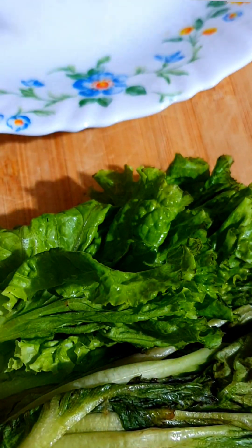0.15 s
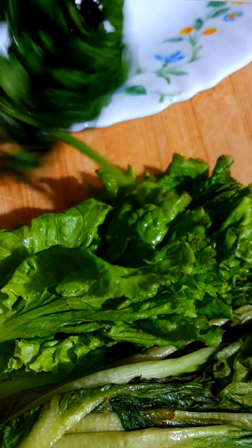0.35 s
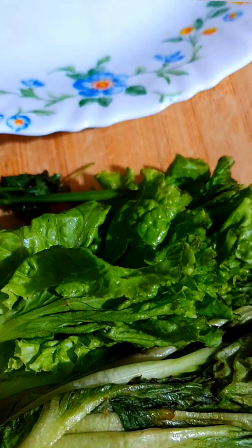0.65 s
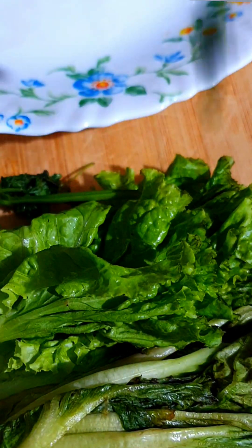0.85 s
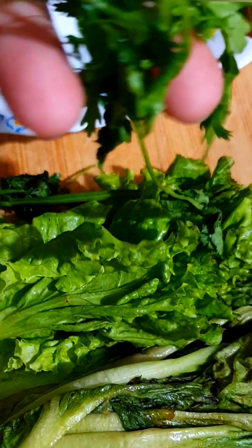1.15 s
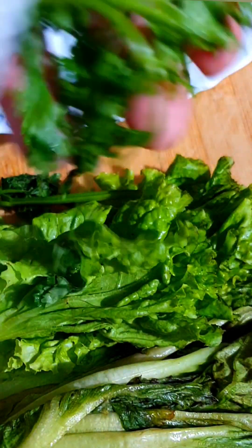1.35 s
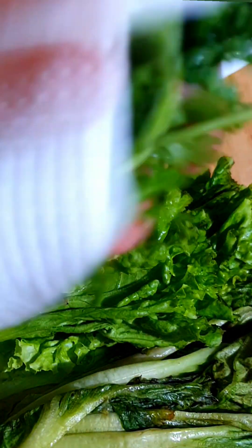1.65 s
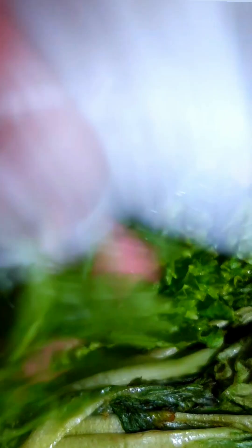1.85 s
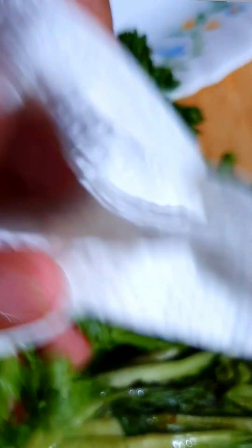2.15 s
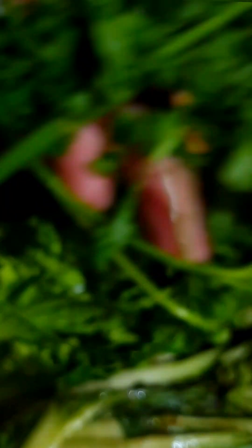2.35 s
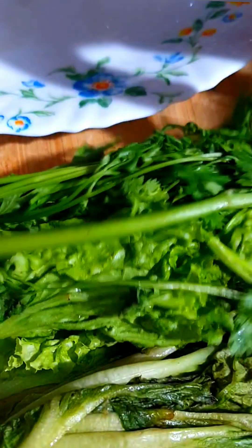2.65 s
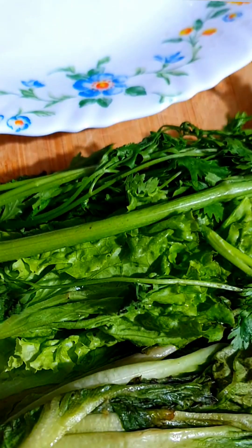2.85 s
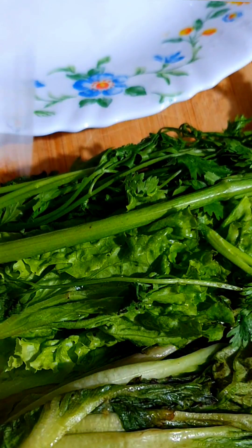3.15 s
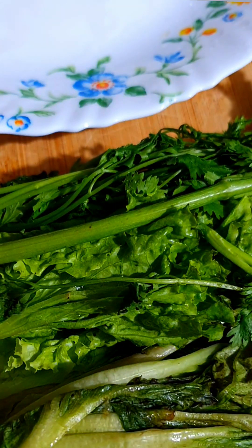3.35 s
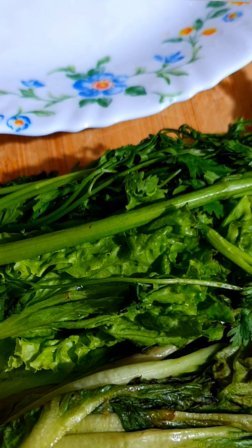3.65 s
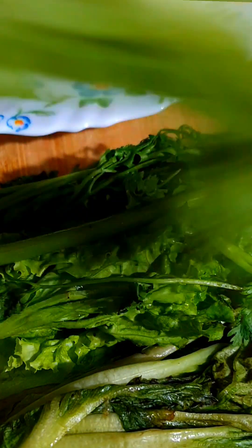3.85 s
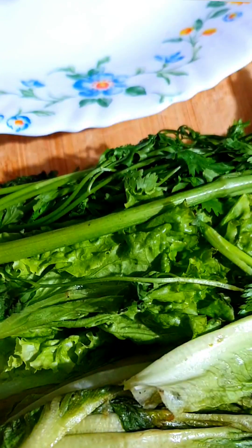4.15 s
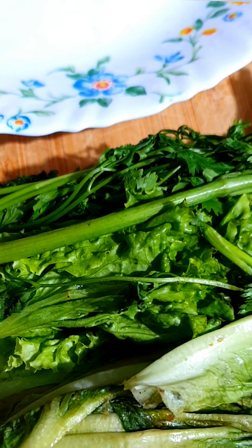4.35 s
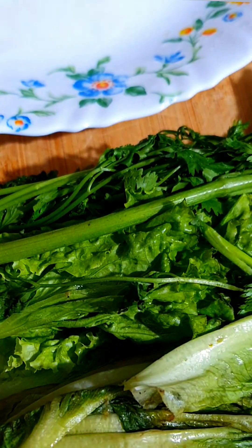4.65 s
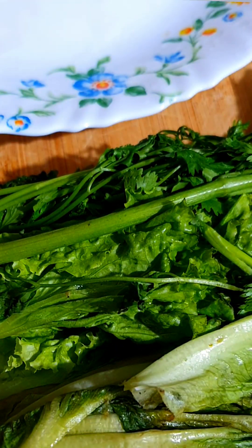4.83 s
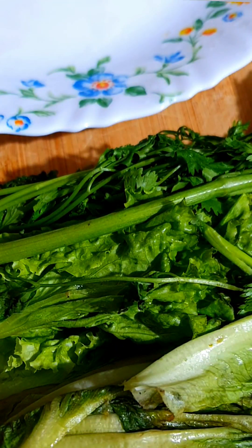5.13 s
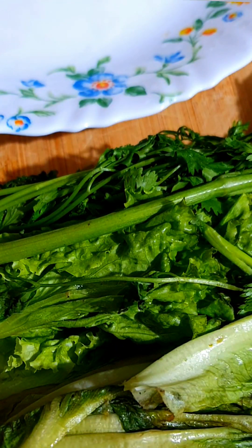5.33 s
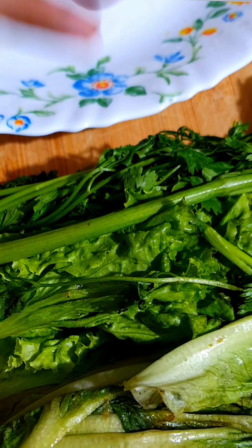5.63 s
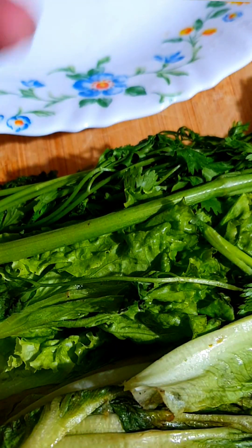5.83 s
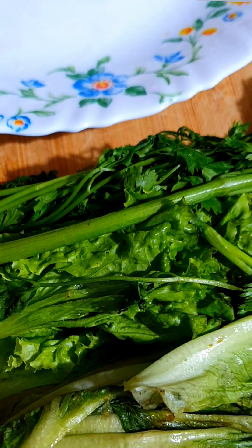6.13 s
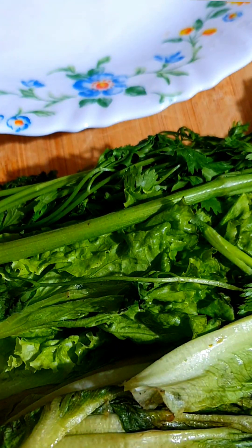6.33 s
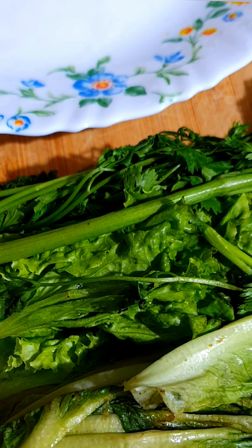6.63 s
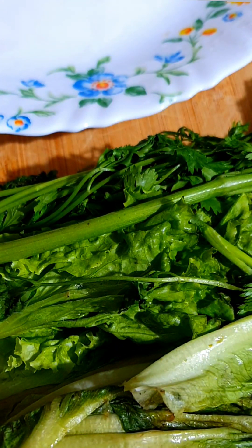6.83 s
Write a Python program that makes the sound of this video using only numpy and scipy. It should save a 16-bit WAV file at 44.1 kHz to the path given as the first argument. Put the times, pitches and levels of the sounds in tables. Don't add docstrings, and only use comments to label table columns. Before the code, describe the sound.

Very close, crisp paper and leaf rustling with soft low thumps as herbs are patted dry, hardest around two seconds. Then it quiens to faint stirring and distant kitchen knocks, followed by gentler leaf slides, small snaps and a faint stalk squeak. Far traffic rumbles underneath. A phone microphone sits beside the hands; the leaves are crisp on the left and heavily dulled on the right.

```python
import sys
import numpy as np
from scipy import signal
from scipy.fft import rfft, irfft, next_fast_len
from scipy.io import wavfile
from scipy.ndimage import uniform_filter1d

SR = 44100
rng = np.random.default_rng(int(sys.argv[2]) if len(sys.argv) > 2 else 0)


def dump(signal):
    limited = np.clip(np.atleast_2d(signal).T, -1, 1)
    pcm = np.round(limited * 32767).astype(np.int16)
    wavfile.write(sys.argv[1], SR, pcm)


def nominal_scale(level):
    x = np.asarray(level, float) / 20
    return 10 ** x


N = 307906
T = np.arange(N) / SR

# f/Hz, level/dB per Hz
LEFT_HISS = [(200, -104), (350, -92.5), (700, -108), (1100, -112), (3000, -115), (6000, -119),
             (10000, -121.5), (15800, -124.5)]
RIGHT_HISS = [(200, -100), (500, -106), (1000, -110), (4000, -114), (6000, -120), (7800, -126),
              (10000, -118), (13000, -121), (15800, -122)]
# t/s, level/dB
TRAFFIC_LEVEL = [(0.0, -49.5), (0.42, -50), (0.56, -58), (0.84, -51.5), (1.12, -59), (2.1, -54),
                 (2.38, -58.5), (2.8, -57.5), (3.5, -58.5), (3.78, -55), (4.62, -58.5), (5.3, -55.5),
                 (6.02, -56.5), (6.3, -55), (6.98, -56.5)]
# f/Hz, level/dB per Hz
RUMBLE_COLOUR = [(20, -20), (40, -6), (70, 5.5), (110, 1.5), (200, -4), (330, -14), (470, -24), (900, -31),
                 (2000, -89)]
# t/s, firing f/Hz, level/dB, upper orders re first/dB
ENGINE_NOTE = [(0, 92, -62, 2), (0.204, 102, -61.5, 0), (0.47, 88.84, -71.5, 4), (0.802, 99.87, -69, 5.5),
               (1.201, 94.23, -68.5, -2.5), (1.751, 125.2, -56.5, -19), (2.9, 125.9, -55, -35.5),
               (3.12, 123.7, -58, -30), (3.299, 97.9, -69, -28), (3.7, 84.1, -56.5, -11.5),
               (4.6, 96, -62.5, -22), (5.05, 112, -53.5, -57), (6.05, 111.5, -51, -27),
               (6.35, 96.1, -58, -7.5), (6.5, 85.9, -68, 2), (6.62, 118.5, -62.5, 2), (6.89, 122.5, -63, 1),
               (6.98, 138, -67, 7)]
# multiple of the firing rate, level/dB
ENGINE_ORDERS = [(2, -1.5), (3, -8), (4, -12.5)]

# t/s, level/dB, rise/s, t60/s, right re left/dB
FAR_KNOCKS = [(2.581, -44.5, 0.012, 0.09, -17), (2.610, -48.5, 0.008, 0.2, -22),
              (2.888, -56, 0.011, 0.24, -27), (3.0, -54.5, 0.016, 0.1, -31), (4.328, -52, 0.012, 0.24, -12),
              (4.399, -57, 0.0053, 0.17, -21), (4.385, -46.5, 0.07, 0.26, -3),
              (4.768, -50, 0.02, 0.42, -21), (4.887, -51.5, .015, 0.091, -16), (2.31, -69.5, 0.026, 1, -25),
              (2.66, -69.5, 0.047, 0.22, -25.5)]
# f/Hz, width/Hz, level/dB
CUP_TONES = [(731, 88, -3), (598, 50, -10.5), (346, 130, -17)]
LID_TONES = [(2070, 320, 8), (2700, 270, 3), (3250, 360, 6), (332, 55, 10.5), (6200, 800, -1),
             (8300, 600, -9)]
DISH_TONES = [(848, 40, 0), (1295, 108, 1.5), (2514, 230, -4.5), (3980, 450, -3), (5320, 330, -1),
              (6530, 230, -4), (305, 95, 8)]
FOIL_TONES = [(7700, 2300, 0)]
DOOR_TONES = [(44.5, 11, 4), (70, 23, -14)]
POT_TONES = [(437, 35, -2), (626, 91, -5.5), (845, 77, -2.5), (1120, 250, -11)]
KNOCKED_OBJECTS = [CUP_TONES, CUP_TONES, LID_TONES, LID_TONES, DISH_TONES, DISH_TONES[1:2],
                   DOOR_TONES, POT_TONES, POT_TONES[1:3], FOIL_TONES, FOIL_TONES]
# f/Hz, level/dB
FAR_RIGHT_COLOUR = [(60, 6.5), (600, 10.5), (780, -3), (1300, 7), (5500, -22), (7500, -10)]
# f/Hz, level/dB
NEAR_RIGHT_SHADOW = [(60, -16), (300, -21), (1000, -27), (1600, -25), (2200, -32), (5000, -62), (7500, -63),
                     (8600, -50), (9300, -15), (11300, -19), (11800, -40), (15500, -54)]

# start t/s, end t/s, first f/Hz, last f/Hz, level/dB
STALK_SQUEAK = (5.2, 5.64, 1610, 1480, -60)
# t/s, peak level/dB, ring f/Hz
FIBRE_TICKS = [(0.489, -36, 6000), (1.29, -24, 11000), (1.2932, -15, 3310), (1.9102, -20, 2500),
               (1.9965, -45, 8000), (3.2882, -52, 5100), (4.3325, -59, 10000), (4.61, -58, 8500),
               (4.664, -56, 7000), (2.33, -59, 9000), (3.5955, -38, 4000), (3.8487, -30, 4500),
               (5.333, -26, 5020), (5.345, -28, 4000), (5.406, -35, 4000), (5.455, -37, 4000),
               (5.6348, -30, 4500), (6.1255, -49, 2500), (6.8165, -53, 12000)]
# t/s, peak level/dB, f/Hz, cycles, rebound/0-1
PALM_PATS = [
    (0.3, -25.5, 72, 0.59, 0.1),
    (0.94, -36.5, 81, 0.8, 0.15),
    (1.529, -19, 67, 0.49, 0.17),
    (1.918, -24.5, 65, 1.4, 0.3),
    (2.036, -16, 74.5, 1.14, 0.06),
    (2.154, -20.5, 63, 0.7, 0.2),
    (2.0255, -29, 180, 0.5, 0),
    (2.1455, -30.5, 330, 0.85, 0),
    (1.9105, -30, 480, 2.17, 0.1),
]
# t/s, peak level/dB, f/Hz, cycles, rebound/0-1
PALM_LIFTS = [
    (1.2765, -20.5, 120, 0.46, 0),
    (1.292, -21, 61, 1.33, 0.05),
    (1.2915, -24, 137, 0.57, 0),
    (1.704, -24.5, 54, .6, 0.14),
    (1.695, -23.5, 105, 1.3, 0),
]
# f/Hz, level/dB per Hz
SLAP_COLOUR = [(60, -15), (150, 10), (400, -1), (800, -3.5), (2000, -38)]
# t/s, peak level/dB, ring f/Hz, length/s
CRUNCHES = [(0.296, -28.5, 3250, 0.011), (0.358, -36.5, 3060, 0.031), (0.753, -31.5, 2258, 0.009),
            (1.2745, -22, 6950, 0.003), (1.5198, -23, 2120, 0.013), (1.691, -22, 2250, 0.01),
            (1.6948, -20.5, 1534, 0.0092), (1.9835, -35, 3754, 0.006), (2.028, -28, 2510, 0.011),
            (2.1398, -35, 3200, 0.012), (4.05, -59, 6500, 0.035), (5.331, -32, 6160, 0.016),
            (5.47, -53, 2290, 0.011), (5.611, -37, 2090, 0.013), (6.547, -53, 2430, 0.016),
            (6.582, -43.5, 2320, 0.046)]
# t/s, peak level/dB, ring f/Hz, length/s
STEM_SNAPS = [
    (0.244, -41.5, 1970, 0.0024),
    (1.2895, -20, 3320, 0.0078),
    (1.909, -26, 1490, 0.0045),
    (3.4535, -30, 3530, 0.002),
    (3.5925, -40, 3420, 0.0044),
    (5.65, -40, 2320, 0.0043),
    (6.462, -38, 2100, 0.004),
    (6.868, -43, 3808, 0.0027),
]

# f/Hz, level/dB per Hz
LEAF_COLOUR = [(180, -0.5), (300, 2), (510, -9.5), (746, 3), (866, -7.5), (1290, -5), (1740, -3.5),
               (2340, -2.5), (6310, -5.5), (12200, -13), (15700, -18)]
# peak t/s, level/dB, rise/s, fall/s, softness/dB
TOWEL_SQUEEZES = [(0.016, -58.5, 0.14, .14, -7.5), (0.232, -62, 0.008, .06, -3),
                  (0.278, -65.5, 0.12, .03, -6), (0.297, -46.5, 0.023, 0.067, -4.5),
                  (0.8, -66.5, .03, 0.21, -4.5), (0.93, -61.5, 0.053, 0.062, -6),
                  (0.984, -61.5, 0.091, 0.096, -8), (1.06, -66, 0.041, 0.055, -9),
                  (1.272, -42, 0.064, 0.056, -6.5), (1.292, -31.5, 0.028, 0.028, -4),
                  (1.532, -38, 0.052, 0.014, -8.5), (1.693, -34, 0.011, 0.023, -6),
                  (1.829, -48, 0.14, 0.035, -13), (1.911, -38.5, 0.0066, 0.016, 0.5),
                  (1.981, -55.5, 0.11, 0.031, -5.5), (2.027, -42, 0.008, 0.024, -9),
                  (2.147, -43, 0.007, 0.03, -9)]
# peak t/s, level/dB, rise/s, fall/s, softness/dB
LEAF_PRESSES = [(3.592, -53, 0.1, 0.064, -12), (3.69, -59.5, 0.05, 0.051, -27),
                (3.76, -51, 0.033, 0.037, -11), (3.922, -76, 0.017, 0.018, -10),
                (4.058, -71, 0.022, 0.03, -30), (5.134, -51.5, 0.097, 0.14, -10.5),
                (5.344, -42, 0.062, 0.11, -15.5), (5.895, -59, 0.086, 0.034, -18),
                (6.209, -67, 0.056, 0.041, -9), (6.46, -56, 0.027, 0.041, -23),
                (6.544, -52.5, 0.016, 0.12, -26), (6.87, -60, 0.016, .1, -46)]
# peak t/s, level/dB, rise/s, fall/s, softness/dB
FAINT_STIRRING = [(2.43, -77, 0.17, 0.31, -32), (2.55, -73.5, 0.1, 0.077, 0),
                  (2.7, -84, 0.13, 0.095, -15.5), (2.92, -78, 0.076, 0.099, 6),
                  (3.01, -67, 0.049, 0.073, -5), (3.12, -83.5, 0.26, 0.11, 22),
                  (3.289, -74, 0.01, 0.015, -14), (4.331, -70, 0.003, 0.03, -12),
                  (4.71, -70, 0.17, 0.18, -10), (4.5, -84, .15, 0.088, -30), (4.18, -89, 0.18, 0.16, 10.5),
                  (4.855, -81, 0.072, 0.061, 24)]
# peak t/s, level/dB, rise/s, fall/s, softness/dB
SMALL_TUGS = [(.372, -58, .04, 0.016, -3), (.49, -65, .02, .03, -5), (.642, -52, .02, .03, -16),
              (.69, -49, 0.055, .03, -5), (.765, -51.5, 0.055, 0.04, -13),
              (1.15, -68.5, 0.069, 0.024, -4.5), (1.682, -46, 0.0047, 0.031, -10),
              (1.925, -48.5, 0.024, .012, -9), (1.967, -55, .014, .05, -11), (2.04, -49.5, .02, 0.016, -6),
              (2.222, -54, .04, 0.011, -15), (3.312, -61, .008, .06, -11), (3.39, -54, .05, 0.056, -14),
              (3.85, -57, .03, 0.026, -5), (3.915, -69.5, .015, .02, -14), (5.225, -57, .05, 0.041, -2),
              (5.4, -47.5, 0.055, 0.023, -11), (5.449, -48, .004, .03, -12), (5.498, -50, .03, .02, -20),
              (5.712, -50, .04, 0.017, -20), (5.78, -56, 0.027, 0.022, -22), (6.056, -68, .02, .03, -17),
              (6.305, -68.5, .03, 0.033, -20), (6.735, -58, .02, 0.061, -24),
              (6.815, -57.5, 0.056, .03, -33), (6.87, -63.5, .012, 0.036, -28),
              (6.94, -58.5, .05, .02, -26)]
# start t/s, length/s, level/dB, change over the stroke/dB, softness/dB
TOWEL_WIPES = [
    (0.327, 0.18, -50.5, -6, -6.5),
    (0.52, 0.1, -67, 6.5, -14),
    (0.629, 0.14, -53.5, 3, -14.5),
    (1.32, 0.13, -58.5, 0.5, -9.5),
    (1.562, 0.058, -57.5, -7.5, -9.5),
    (1.858, 0.041, -65, 1, -12),
    (2.073, 0.032, -57.5, -1, -10.5),
    (2.146, 0.073, -55.5, -5, -7.5),
    (2.247, 0.052, -70.5, -8, -6),
]
# start t/s, length/s, level/dB, change over the stroke/dB, softness/dB
LEAF_SLIDES = [(3.334, 0.11, -56, -2.5, -10.5), (3.474, 0.024, -58.5, -18, -12.5),
               (3.619, 0.15, -69, 6, -1.5), (3.785, 0.1, -54.5, -3.5, -10.5), (4.878, 0.21, -56, -1.5, -9),
               (5.153, 0.092, -63, 7.5, -12.5), (5.324, 0.089, -47.5, -3, -13),
               (5.456, 0.045, -54, 4, -12.5), (5.53, 0.055, -55, 4, -13.5), (5.606, 0.041, -52, 4.5, -14),
               (5.67, 0.045, -54, -0.5, -13), (5.75, 0.088, -55, 3.5, -16), (5.908, 0.13, -67, -16, -16),
               (6.048, 0.11, -63, -1.5, -13.5), (6.183, 0.31, -79.5, 9.5, -25),
               (6.634, 0.38, -62.5, -3.5, -14.5)]
# t/s, length/s, treble level/dB
CRISP_MOMENTS = [(.645, .015, 1), (.715, .02, 1), (1.24, .015, 5), (1.293, 0.0088, 6.5), (1.34, .015, -5),
                 (1.538, 0.0068, -3), (1.703, 0.013, -12), (1.807, 0.024, -8), (1.922, .012, 2.5),
                 (2.15, .012, -3), (3.37, 0.035, 1), (3.433, .015, 1), (3.752, .015, 7), (3.793, .02, -7),
                 (3.875, 0.027, 6), (4.887, .04, -5), (5.07, .02, 1.5), (5.294, 0.014, 4),
                 (5.46, 0.014, 3.5), (5.523, 0.014, -5), (5.621, .03, 4.5), (.43, .025, 4),
                 (5.903, .015, 5), (6.1, 0.078, -3.5), (6.54, .015, 5), (6.6, 0.036, -4),
                 (6.728, .015, 0.5), (6.784, .02, -4), (6.847, 0.01, -3), (6.93, 0.068, 2.5)]
# t/s, length/s, f/Hz, level/dB
SINGING_LEAVES = [(0.354, .012, 3000, 12), (0.377, .01, 3250, 16), (0.458, .02, 2200, 9),
                  (.55, .02, 3280, 9), (0.646, .012, 2300, 5), (0.682, .02, 2500, 7.5),
                  (0.753, .015, 2300, 8), (.76, .012, 3570, 8), (2.445, .015, 4300, 11),
                  (1.2757, .0015, 7000, 14), (1.619, .006, 3100, 24), (1.79, 0.024, 2000, 7.5),
                  (1.978, 0.0032, 3780, 23.5), (3.388, 0.019, 3500, 4.5), (3.69, .015, 3150, 6),
                  (3.757, .01, 6140, 5), (4.06, .02, 6500, 9), (4.89, 0.039, 1850, 9),
                  (4.99, 0.024, 2660, -2), (5.127, 0.025, 2200, 9.5), (5.218, .02, 2400, 4),
                  (5.338, .015, 6000, 7), (5.345, .03, 3200, 6), (5.545, .025, 3040, 5.5),
                  (5.71, .015, 5000, 5), (5.854, 0.031, 1960, 10), (6.058, 0.018, 1750, 13),
                  (6.08, 0.0098, 2200, 7), (6.125, .01, 1920, 8), (6.21, 0.03, 3670, 6),
                  (6.305, .02, 4800, 7), (6.41, 0.023, 4500, 6), (.43, .04, 1360, 9),
                  (6.683, .015, 2200, 8), (.692, .015, 1100, 10), (6.781, .015, 2100, 7),
                  (6.803, .012, 4000, 9), (6.937, 0.014, 2590, 9)]

AWAY_S = 5.95


def evened(x):
    return x / np.sqrt(np.mean(x ** 2) + 1e-20)


def read(points, hz):
    f, value = np.transpose(points)
    return np.interp(np.log(hz + 1), np.log(f + 1), value)


def coloured(x, points):
    size = next_fast_len(N)
    gain = nominal_scale(read(points, np.fft.rfftfreq(size, 1 / SR)))
    return irfft(rfft(x, size) * gain, size)[..., :N]


def slow(hz):
    return evened(signal.lfilter(*signal.butter(1, hz / SR * 2), rng.standard_normal(N)))


def smeared(x, bins, frames):
    return uniform_filter1d(uniform_filter1d(x, bins, axis=0), frames, axis=1)


def resonate(x, hz, width):
    return signal.lfilter(*signal.iirpeak(hz, hz / width, SR), x)


def add(mix, s, sound):
    part = mix[..., round(s * SR):][..., :sound.shape[-1]]
    part += sound[..., :part.shape[-1]]


def hiss(points, patchy_db):
    hz, t, z = signal.stft(rng.standard_normal(N), SR, nperseg=512)
    patches = evened(smeared(rng.standard_normal(z.shape), 7, 8))
    z = z * nominal_scale(read(points, hz)[:, None] + patchy_db * patches)
    return signal.istft(z, SR, nperseg=512)[1][:N] * np.sqrt(SR / 2)


def traffic(alike=0.75, left_db=8, lumpy_db=1.6, upper_right_db=-6):
    a, b = coloured(rng.standard_normal((2, N)), RUMBLE_COLOUR)
    level_db = np.interp(T, *np.transpose(TRAFFIC_LEVEL)) - 1.5 + lumpy_db * slow(3.4)
    level = nominal_scale(level_db) / np.sqrt(np.mean(a ** 2))
    s, hz, db, upper_db = np.transpose(ENGINE_NOTE)
    turns = np.cumsum(np.interp(T, s, hz) * (1 + .03 * slow(15))) / SR
    first = nominal_scale(np.interp(T, s, db) + 3 * slow(4)) * np.cos(2 * np.pi * turns)
    upper = sum(nominal_scale(g + 4 * slow(10)) * np.cos(2 * np.pi * k * turns) for k, g in ENGINE_ORDERS)
    upper = nominal_scale(np.interp(T, s, db + upper_db) + 4.5) * upper
    left = level * (alike * a + np.sqrt(1 - alike ** 2) * b) + first + upper
    return np.array([nominal_scale(left_db) * left, level * a + first + nominal_scale(upper_right_db) * upper])


def knocks():
    out, t = np.zeros((2, N)), np.arange(SR // 2) / SR
    for (s, db, rise, t60, right_db), body in zip(FAR_KNOCKS, KNOCKED_OBJECTS):
        noise = rng.standard_normal((2, len(t)))
        noise[1] = .6 * noise[0] + .8 * noise[1]
        tones = [nominal_scale(g) / np.sqrt(w) * resonate(resonate(noise, hz, w), hz, 2 * w) for hz, w, g in body]
        ring = evened(sum(tones))
        fall_db = -60 * (np.maximum(t - rise, 0) / (.72 * t60)) ** 1.7
        shape = np.clip(t / rise, 0, 1) * nominal_scale(db + fall_db)
        add(out, s, evened(ring * shape) * np.sqrt(np.mean(shape ** 2)) * nominal_scale([[0], [right_db]]))
    return out


def kitchen(x, wet_db=-12, t60=.07):
    t = np.arange(SR // 8) / SR
    taps = rng.choice([-1., 1.], (2, len(t))) * (rng.random((2, len(t))) < .05)
    taps = taps * nominal_scale(-60 * t / t60) * (t > .001)
    return x + nominal_scale(wet_db) * signal.oaconvolve(x, taps / np.linalg.norm(taps[0]), axes=1)[:, :N]


def squeak():
    start, end, first_hz, last_hz, db = STALK_SQUEAK
    along = np.clip((T - start) / (end - start), 0, 1)
    turns = np.cumsum((first_hz + (last_hz - first_hz) * along) * (1 + .02 * slow(80))) / SR
    swell = np.sqrt(np.sin(np.pi * along) + 1e-9)
    return nominal_scale(db + 5 * slow(30)) * swell * np.cos(2 * np.pi * turns)


def ticks(cycles=1.0):
    out, t = np.zeros((2, N)), np.arange(400) / SR
    for s, db, hz in FIBRE_TICKS:
        fading = nominal_scale(db + 5 - 60 * t * hz / (3 * cycles))
        add(out, s, fading[None] * np.sin(2 * np.pi * hz * t))
    return out


def pats(slap_db=-18):
    out, slap, t = np.zeros(N), np.zeros(N), np.arange(-2000, 3000) / SR
    for push, table in [(1, PALM_PATS), (-1, PALM_LIFTS)]:
        for s, db, hz, cycles, rebound in table:
            late = t - rebound / hz
            width = cycles / hz * np.where(late < 0, .45, .6)
            shape = nominal_scale(db) * np.exp(-(late / width) ** 2)
            add(out, s - 2000 / SR, push * shape * np.cos(2 * np.pi * hz * t))
            add(slap, s - 2300 / SR, nominal_scale(db) * np.exp(-(t / 0.0066) ** 2))
    return out + nominal_scale(slap_db) * slap * evened(coloured(rng.standard_normal(N), SLAP_COLOUR))


def crackles():
    out, t = np.zeros((2, N)), np.arange(3000) / SR
    for s, db, hz, length in CRUNCHES + STEM_SNAPS:
        noise = rng.standard_normal((2, 3000))
        rise = 1 - np.exp(-t / (0.0001 + 0.16 * length))
        burst = noise * rise * nominal_scale(-60 * t / (3 * length + 0.00044))
        add(out, s, nominal_scale(db + 5.0) * (0.88 * burst + 2.1 * resonate(burst, hz, 0.14 * hz)))
    return coloured(out, LEAF_COLOUR)


def rings(hz, t, octaves=0.19):
    pitch = hz[:, None] + 1
    return sum(db * np.exp(-(np.log2(pitch / f) / octaves) ** 2 - ((t - s) / length) ** 2)
               for s, length, f, db in SINGING_LEAVES)


def strokes(t, grip_s=0.024, release_s=0.031, edge_db=20):
    touches = TOWEL_SQUEEZES + LEAF_PRESSES + FAINT_STIRRING + SMALL_TUGS
    quick = [(s, 0, db, 0, soft, rise, fall) for s, db, rise, fall, soft in touches]
    drags = [(*row, grip_s, release_s) for row in TOWEL_WIPES + LEAF_SLIDES]
    s, length, db, change_db, soft_db, rise, fall = np.array(quick + drags).T[:, :, None]
    early = np.maximum(s - t, 0) / rise
    late = np.maximum(t - s - length, 0) / fall
    held = np.clip((t - s) / (length + 1e-9), 0, 1)
    power = nominal_scale(np.maximum(db + change_db * held - edge_db * (early + late), -150)) ** 2
    soft_db = (power * soft_db).sum(0) / power.sum(0)
    level_db = 10 * np.log10(power.sum(0))
    fizz_db = sum(db * np.exp(-((t - s) / length) ** 2) for s, length, db in CRISP_MOMENTS) - 8
    fizz_db = fizz_db - 0.4 * np.maximum(soft_db, -12) + 0.013 * np.clip(level_db + 44.0, -20, 5)
    return level_db, soft_db, fizz_db - 0.5 * (t > AWAY_S)


def rustle(flicker_db=1.44, grain_db=4.0, grains_per_s=3000, grain_share=0.46, patchy_db=2.0,
           blotchy_db=0.5, alike=0.19, body_hz=1900, body_octaves=0.79):
    sizes = nominal_scale(grain_db * np.minimum(rng.exponential(1, (2, N)), 2.4))
    slips = (rng.random((2, N)) < grains_per_s / SR) * sizes * rng.choice([-1., 1.], (2, N))
    rubbing = rng.standard_normal((2, N))
    drive = np.sqrt(grain_share) * evened(slips) + np.sqrt(1 - grain_share) * rubbing
    drive[1] = alike * drive[0] + np.sqrt(1 - alike ** 2) * drive[1]
    hz, t, z = signal.stft(drive, SR, nperseg=256, noverlap=192)
    level_db, soft_db, fizz_db = strokes(t)
    pitch = hz[:, None] + 1
    body = np.clip(np.log2(body_hz / pitch) / body_octaves, 0, 1)
    fizz = np.clip(np.log2(pitch / 4500), 0, 1.4)
    colour_db = body * (np.clip(soft_db, -30, 6) + 11.0) + fizz * (fizz_db + 1.0)
    colour_db = colour_db - 8 * np.clip(hz[:, None] / 12000 * 6 - 6, 0, 1) * (t > AWAY_S)
    patches = evened(smeared(rng.standard_normal(z.shape[1:]), 5, 20))
    blotches = evened(smeared(rng.standard_normal(z.shape[1:]), 22, 30))
    colour_db = colour_db + read(LEAF_COLOUR, hz)[:, None] + rings(hz, t)
    z = z * nominal_scale(colour_db + patchy_db * patches + blotchy_db * blotches)
    flicker = flicker_db * slow(50) + 1.6 * slow(260)
    rubbed = signal.istft(z, SR, nperseg=256, noverlap=192)[1][:, :N]
    return rubbed * nominal_scale(np.interp(T, t, level_db) + 13.5 + flicker)


def scene():
    near = kitchen(rustle() + crackles() + ticks() + squeak()) + pats()
    near[1] = coloured(near[1], NEAR_RIGHT_SHADOW)
    far = knocks()
    far[1] = coloured(far[1], FAR_RIGHT_COLOUR)
    return near + far + traffic()


def wind_filter(left, on_s=2.415, cut_hz=415):
    high_pass = signal.butter(4, cut_hz, "high", fs=SR, output="sos")
    cut = signal.sosfilt(high_pass, left) + nominal_scale(-29.5) * left
    on = np.clip((T - on_s) / 0.0086, 0, 1)
    return (1 - on) * left + on * cut


def thin_fading(x, margin_db=1.5, depth_db=-24, ceiling_db=-97, holes=.35, gate_db=-6):
    hz, t, z = signal.stft(x, SR, nperseg=512)
    level_db = 10 * np.log10(smeared(abs(z[0]) ** 2, 5, 5) + 1e-16)
    faint_db = np.minimum(level_db, ceiling_db) - ceiling_db
    recent_db = signal.lfilter([.03], [1, -.97], faint_db, axis=1) + ceiling_db
    strips = evened(smeared(rng.standard_normal(level_db.shape), 2, 14)) > holes
    treble = abs(hz[:, None] - 8000) < 4500
    faded = np.clip(recent_db - margin_db - level_db, 0, 1) * treble * (t > 2.3)
    shut = faded * strips
    left_only = np.array([1, 0])[:, None, None]
    z = z * nominal_scale(gate_db * (.5 * smeared(faded, 9, 5) + shut) * left_only)
    z = z - z.mean(0) * (1 - nominal_scale(depth_db * shut))
    return signal.istft(z, SR, nperseg=512)[1][:, :N]


def top_cut(x):
    return signal.sosfilt(signal.butter(12, 15840, fs=SR, output="sos"), x)


def record(dry):
    left = wind_filter(dry[0]) + hiss(LEFT_HISS, patchy_db=1.5)
    right = np.roll(dry[1], 18) + hiss(RIGHT_HISS, patchy_db=0.4)
    limited = .42 * np.tanh(thin_fading(np.array([left, right])) / .42)
    low_pass = signal.firwin(1201, 15745, window="blackman", fs=SR)
    finished = signal.oaconvolve(limited, low_pass[None], "same")
    return top_cut(finished)


dry = scene()
out = record(dry)
dump(out)
```